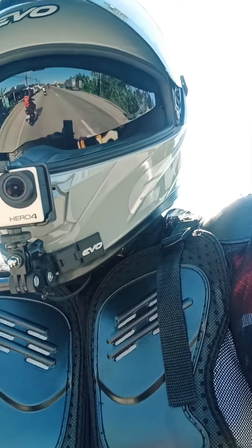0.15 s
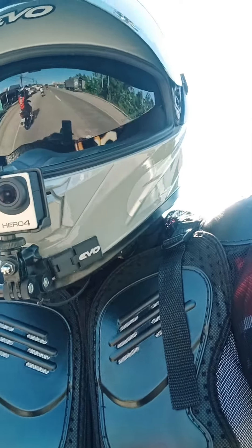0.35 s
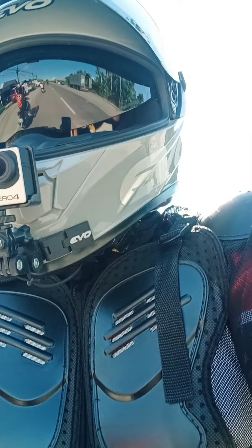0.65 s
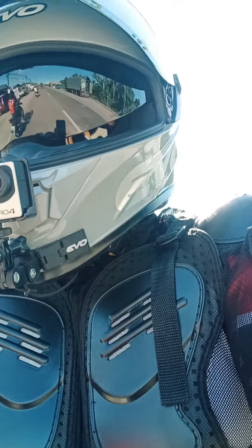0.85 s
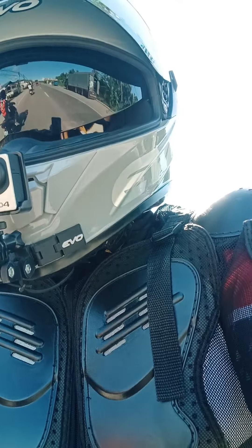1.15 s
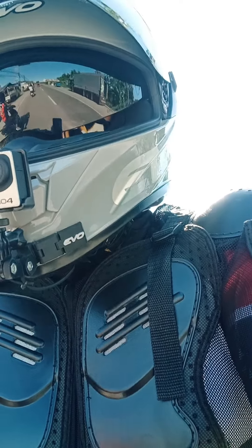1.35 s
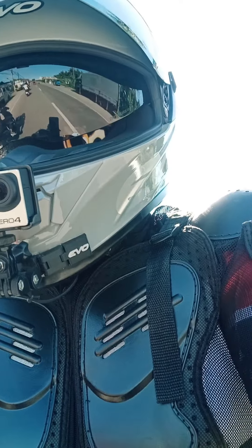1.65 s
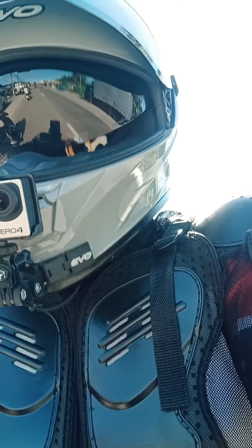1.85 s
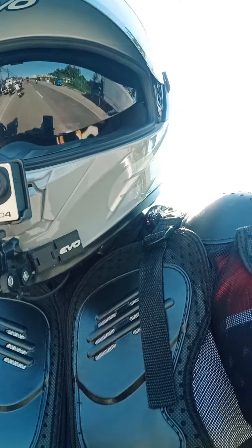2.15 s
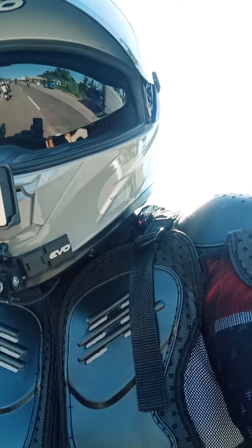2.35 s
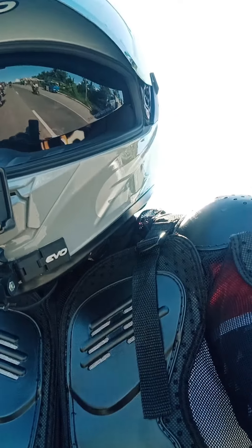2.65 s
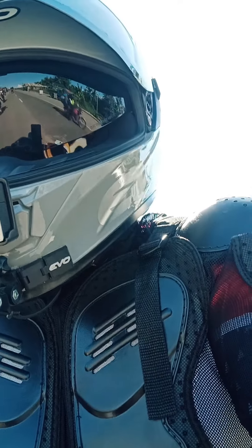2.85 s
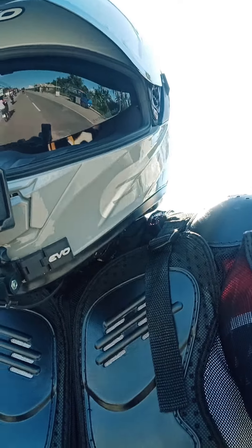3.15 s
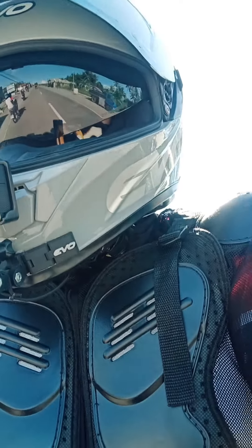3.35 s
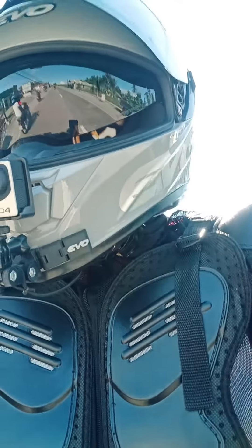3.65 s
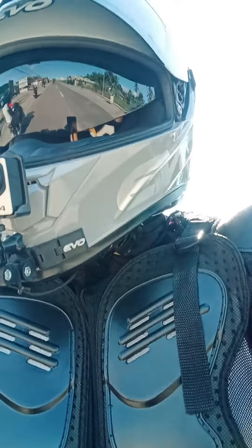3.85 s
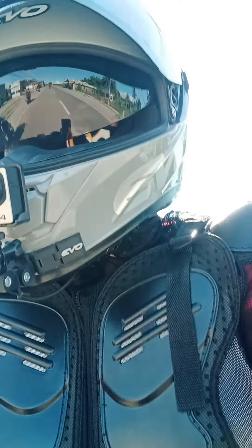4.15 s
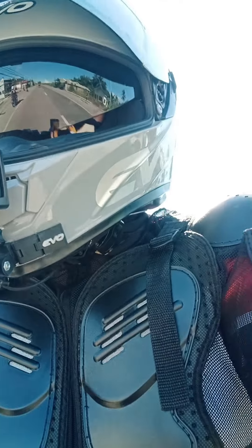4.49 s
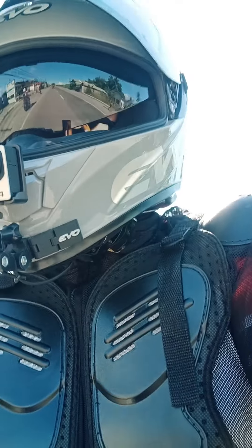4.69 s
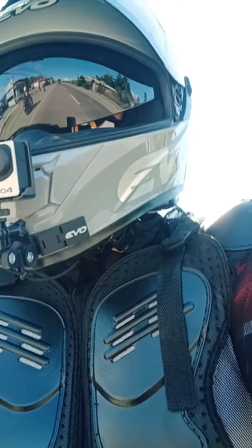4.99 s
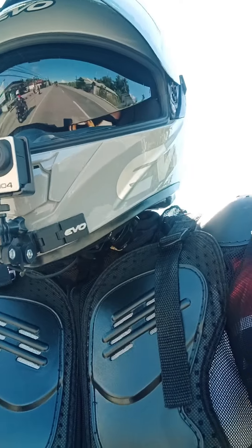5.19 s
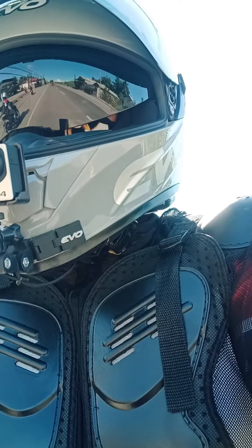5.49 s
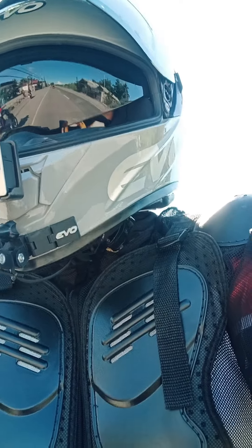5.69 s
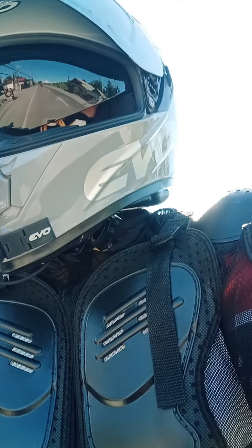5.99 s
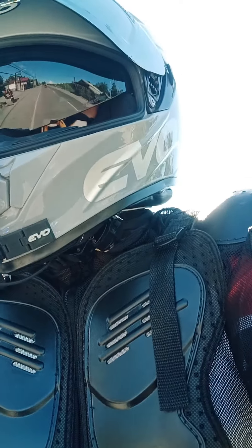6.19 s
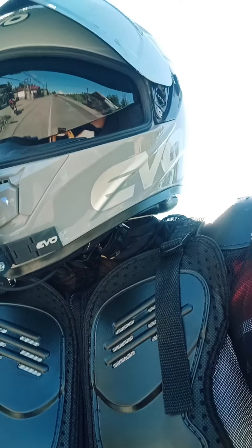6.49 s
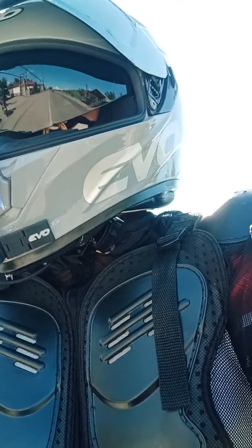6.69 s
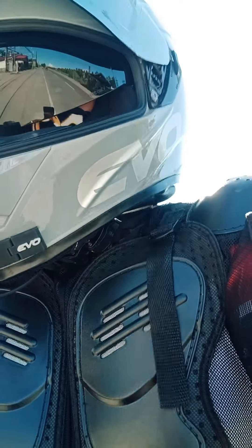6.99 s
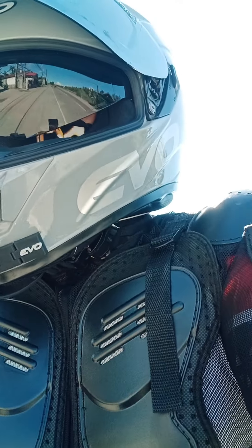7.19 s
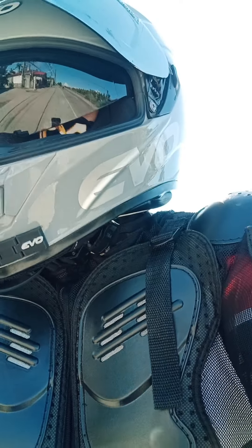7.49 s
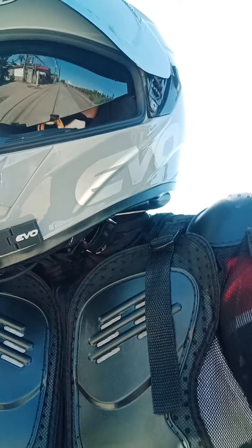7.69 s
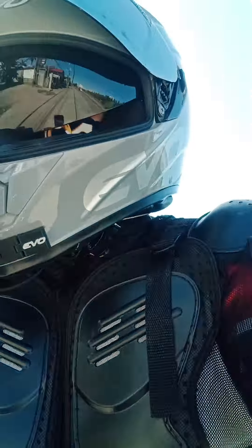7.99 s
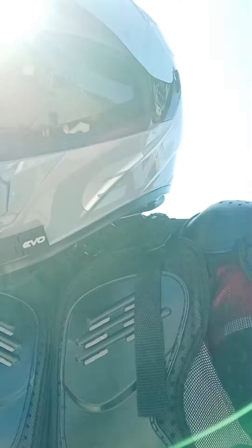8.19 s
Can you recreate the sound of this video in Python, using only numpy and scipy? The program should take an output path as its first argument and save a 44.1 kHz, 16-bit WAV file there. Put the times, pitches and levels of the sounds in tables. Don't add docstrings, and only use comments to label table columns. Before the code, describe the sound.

Close, muffled scooter engine heard from a closed camera housing on the handlebar: a dull low throb with a rough bark, over wind rumble and soft tyre hiss. Broken road knocks the mount early, then a parked truck throws the exhaust back hollow and raspy. More bumps follow, the engine stumbles and surges, a far horn toots faintly, and the ride ends coasting lower.

```python
import sys
import numpy as np
from scipy import signal
from scipy.fft import rfft, irfft, next_fast_len
from scipy.io import wavfile
from scipy.ndimage import uniform_filter1d, map_coordinates

SR = 44100
rng = np.random.default_rng(int(sys.argv[2]) if len(sys.argv) > 2 else 0)


def to_wav(sig):
    pcm = np.clip(np.atleast_2d(sig), -1, 1) * 32767
    pcm = np.round(pcm).astype(np.int16)
    wavfile.write(sys.argv[1], SR, pcm.T)


def field_ratio(decibels):
    return 10 ** (np.asarray(decibels, dtype=float) / 20)


N = 367794

# start in seconds, length in seconds, pitch in Hz, rms level in dB.
HORN_TOOTS = [
    (5.978, .085, 3053, -60),
    (6.143, .065, 3050, -63),
    (6.295, .045, 2780, -66),
    (6.393, .07, 3047, -63),
    (6.4, .09, 1085, -62),
    (6.63, .06, 3048, -62.5),
]
# time in seconds, peak level in dB.
GRIT_HITS = [
    (1.83, -43),
    (3.772, -42),
    (3.7845, -27),
    (3.812, -44),
]
# centre in Hz, width in Hz, level in dB.
SHELL_RINGS = [(4350, 300, 3), (5900, 350, -7), (8300, 900, -12), (11400, 800, -13), (14200, 1200, -10)]

# time in seconds, peak level in dB, rattle level in dB above the knock.
BUMPS = [(.158, -39, -23), (0.552, -33, -17.5), (.573, -34, -31), (.609, -39, -25), (0.654, -36, -36),
         (.708, -36, -19.5), (.802, -43, -27), (1.041, -38, -23.5), (1.192, -38, -24), (1.226, -36, -22),
         (1.248, -32, -31), (1.569, -43, -21), (3.411, -43, -1), (3.988, -44.5, -19.5),
         (4.288, -30.5, -27.5), (4.379, -37, -17), (4.476, -38, -19), (4.561, -37, -24.5),
         (4.572, -31, -16.5), (4.603, -32, -18.5), (4.632, -31.5, -23), (4.661, -36.5, -26.5),
         (4.77, -32, -20), (4.795, -33, -16.5), (4.905, -38, -12.5), (5.705, -40, -20), (5.997, -29, -9),
         (6.028, -30.5, -19), (6.168, -31, -20.5), (6.199, -26.5, -22.5)]
# start in seconds, end in seconds, peak level in dB.
ROUGH_ROAD = [
    (0, 0.802, -38),
    (0.999, 1.75, -47),
    (3.842, 4.562, -45.5),
]
# centre in Hz, width in Hz, level in dB.
FRAME_RINGS = [(304, 230, -17), (380, 114, 14), (634, 343, 4.5)]
# centre in Hz, width in Hz, level in dB.
PANEL_RINGS = [(745, 300, -3), (1383, 260, -2), (1640, 280, -6.5), (2820, 1400, -25.5)]
# centre in Hz, width in Hz, level in dB.
LOOSE_RINGS = [(3000, 790, -7), (4360, 1400, -5), (6230, 1500, -5), (8150, 1500, -7.5), (14500, 2300, -14)]
STRAP_LOOSE_UNTIL_S = 2

# time in seconds, buffeting level in dB.
WIND_LEVEL = [(0, -32), (.6, -32.5), (.9, -38), (2.0, -42.5), (2.8, -37.5), (3.3, -39), (4.0, -37),
              (4.6, -35), (5.2, -38.5), (6.1, -41), (6.6, -40.5), (8.34, -48.5)]
# frequency in Hz, level in dB per Hz.
BUFFET_COLOUR = [(15, -44), (25, -33), (40, -24), (60, -10), (90, 0), (140, -1), (200, -6), (260, -30),
                 (400, -80)]
# frequency in Hz, level in dB per Hz.
WHISTLE_COLOUR = [(5880, -29.5), (10000, -3.5), (12600, -1), (14900, 5), (15500, 6.5)]
# frequency in Hz, level in dB per Hz.
HISS_COLOUR = [(1150, -10), (1950, -2.5), (2250, -7), (2760, -1), (3080, -5), (3210, -4.5), (4320, -6.5),
               (6480, -12.5), (8060, -9), (9730, -21.5), (11000, -30.5), (14300, -42.5), (22000, -120)]
# time in seconds, level in dB over the open road.
ROADSIDE_ECHO = [(0, 1.5), (.4, -2), (1.0, -2), (2.08, -1), (2.3, 3), (2.7, 8), (2.95, 2.5), (3.2, 1.5),
                 (4.15, 1), (4.4, 2), (4.8, 0), (6.2, -0.5), (6.55, 3), (7.0, 2.5), (7.3, 1), (7.8, -0.5),
                 (8.34, 0.5)]
WHISTLE_DB, WHISTLE_ECHO, WHISTLE_MIDDLE_DB = -72.0, 1.1, 3
HISS_DB, HISS_ECHO = -60.1, 0.96
RASP_DB, RASP_ECHO = -63.45, 1.4
BARK_DB, BARK_ECHO, BARK_WIND, BARK_PULL, BARK_COAST_DB = -38.5, 0.62, 0.64, 0.3, -2.5

# start in seconds, end in seconds, multiple of the firing rate, rms level in dB.
DRIVE_WHINE = [
    (5.08, 5.9, 76, -76),
    (5.08, 5.9, 94.7, -77),
    (6.65, 7.75, 65.8, -78),
    (6.65, 7.75, 71.8, -76),
    (6.65, 7.4, 96, -80),
]

# time in seconds, echo level in dB.
TRUCK_ECHO = [(1.95, -89), (2.1, -43), (2.45, -43), (2.65, -39.5), (2.85, -38), (3.05, -43.5),
              (3.25, -50.5), (3.45, -85)]
# centre in Hz, width in Hz, level in dB.
TRUCK_BOX = [(399, 60, 0.91), (530, 130, -0.94), (648, 152, -1.5)]
# start in seconds, end in seconds, change in dB.
TRUCK_NULLS = [
    (2.087, 2.355, -20),
    (2.988, 3.18, -17),
]
TRUCK_CANCEL_DB = [-5.5, -2.5, 1.5]

# frequency in Hz, level in dB per Hz.
BARK_COLOUR = [(130, -39), (215, 3.5), (318, -8), (386, -9.5), (453, -12.5), (553, -15.5), (1000, -32.5),
               (1300, -51), (2200, -120)]
# frequency in Hz, level in dB per Hz.
RASP_COLOUR = [(530, -24), (900, -0.5), (1030, -3), (1310, -1.5), (1610, 0), (2300, -21.5), (2990, -45),
               (5060, -120)]
# frequency in Hz, rms level in dB.
WEAK_ORDERS = [(55, -54), (70, -44), (90, -36), (200, -40), (260, -43), (300, -47), (350, -52), (450, -58),
               (550, -55), (700, -63), (900, -67), (1150, -77), (1400, -72)]
# frequency in Hz, level in dB.
PIPE_ANSWER = [(90, -7.5), (105, -3.5), (125, -5), (139, -4), (154, 0), (175, -1.5), (190, -10.5),
               (225, -19)]
# time in seconds, beat level in dB.
ENGINE_PULL = [(0, -27), (.5, -28.5), (1.1, -29), (1.5, -30.5), (2.1, -31), (2.4, -29), (2.65, -26.5),
               (3.1, -26), (3.3, -28), (3.5, -25.5), (4.3, -25.5), (4.8, -28), (5.15, -23.5), (5.7, -25),
               (6.05, -27.5), (6.5, -22.5), (7.6, -24), (8.34, -27.5)]
# time in seconds, firings per second.
FIRING_RATE = [(0.0, 40.06), (1.005, 36.72), (1.958, 33.78), (2.175, 36.15), (2.554, 34.82), (3.004, 36.03),
               (3.34, 33.59), (3.483, 35.49), (4.508, 32.71), (4.755, 36.52), (4.967, 36.82),
               (5.135, 41.01), (5.978, 33.94), (6.221, 37.24), (6.392, 35.54), (6.617, 45.27),
               (6.902, 42.72), (8.34, 30.45)]
# start in seconds, end in seconds, scatter of the firing moment in cycles.
STUMBLES = [
    (2.05, 2.45, .025),
    (3.24, 3.48, .06),
    (4.53, 4.95, .075),
    (5.95, 6.29, .075),
]
FIRST_TURN, FLYWHEEL_S = .828, .06
STRONG_ORDERS = range(3, 6)

TOP_HZ = 15600


def curves(rows):
    s, *columns = np.transpose(rows)
    return [np.interp(np.arange(N) / SR, s, column) for column in columns]


def unit(x):
    return x / np.sqrt(np.mean(x ** 2) + 1e-20)


def wobble(rate):
    at = np.arange(0, N + 64, 64)
    points = rng.standard_normal(int(N * rate / SR) + 4)
    return np.interp(np.arange(N), at, map_coordinates(points, [at * rate / SR]))


def gate(start, end, edge):
    t = np.arange(N) / SR
    return np.clip(np.minimum(t - start, end - t) / edge + .5, 0, 1)


def filtered(x, response):
    m = next_fast_len(N + 8192)
    return irfft(rfft(x, m) * response(np.fft.rfftfreq(m, 1 / SR)), m)[:N]


def coloured(x, spectrum):
    f, db = np.transpose(spectrum)

    def response(hz):
        return field_ratio(np.interp(np.log(hz + 1), np.log(f), db, -120, -120))
    return unit(filtered(x, response))


def ringing(x, modes):
    def response(f):
        total = 0
        for k, (centre, width, db) in enumerate(modes):
            swing = 1j * f * width
            total = total + (-1) ** k * field_ratio(db) * swing / (centre * centre - f * f + swing)
        return total
    return filtered(x, response)


def bursts(times, levels_db, t60):
    t = np.arange(int(.06 * SR)) / SR
    attack = 1 - np.exp(-t / 0.001)
    x = np.zeros(N + len(t))
    for s, db, life in np.broadcast(times, levels_db, t60):
        x[round(s * SR):][:len(t)] += field_ratio(db - 60 * t / life) * attack * rng.standard_normal(len(t))
    return x[:N]


def crank():
    rate = uniform_filter1d(curves(FIRING_RATE)[0], int(FLYWHEEL_S * SR))
    return rate, FIRST_TURN + np.cumsum(rate) / SR


def shaft():
    scatter = .003 + sum(size * gate(a, b, .08) for a, b, size in STUMBLES)
    return 2 * np.pi * (crank()[1] + scatter * .8 * wobble(30))


def puffs(lead, decay, steady, scatter_db):
    turn = crank()[1] + lead
    strengths = field_ratio(scatter_db * rng.standard_normal(int(turn[-1]) + 2))
    size = strengths[turn.astype(int)]
    u = turn % 1 / decay
    return (steady + size * np.e * u * np.exp(-u)) * rng.standard_normal(N)


def orders_db():
    f, db = np.transpose(PIPE_ANSWER)
    rate = crank()[0]
    near = np.clip((curves(TRUCK_ECHO)[0] + 60) / 15, 0, 1)
    pull_db, = curves(ENGINE_PULL)
    levels = []
    for k, cut in zip(STRONG_ORDERS, TRUCK_CANCEL_DB):
        levels.append(pull_db + np.interp(np.log(k * rate), np.log(f), db) + near * cut)
    levels[0] = levels[0] + sum(null_db * gate(a, b, 0.071) for a, b, null_db in TRUCK_NULLS)
    return levels


def horn():
    t = np.arange(N) / SR
    drift = .5 * wobble(40)
    x = np.zeros(N)
    for s, length, hz, db in HORN_TOOTS:
        on = np.clip(np.minimum(t - s, s + length - t) / .014, 0, 1)
        x += np.sqrt(2) * field_ratio(db) * on * np.sin(2 * np.pi * hz * t + drift)
    return x


def air():
    echo_db, = curves(ROADSIDE_ECHO)
    gust = wobble(11)
    hiss_db = HISS_DB + HISS_ECHO * echo_db + 0.68 * gust
    hiss = coloured(puffs(0.43, decay=.15, steady=4.5, scatter_db=5), HISS_COLOUR)
    whistle_db = WHISTLE_DB + WHISTLE_ECHO * echo_db + WHISTLE_MIDDLE_DB * gate(2.5, 6.2, 0.58)
    whistle_db = whistle_db + .3 * gust + 1.9 * wobble(40)
    whistle = coloured(rng.standard_normal(N), WHISTLE_COLOUR)
    buffet_db = curves(WIND_LEVEL)[0] + 1.5 * wobble(8)
    buffet = coloured(rng.standard_normal(N), BUFFET_COLOUR)
    return field_ratio(hiss_db) * hiss + field_ratio(whistle_db) * whistle + field_ratio(buffet_db) * buffet


def grit():
    x = np.zeros(N)
    for s, db in GRIT_HITS:
        x[round(s * SR)] = field_ratio(db + 22.5)
    return ringing(x, SHELL_RINGS)


def knocks():
    small = []
    for start, end, db in ROUGH_ROAD:
        for u, v in rng.random((8, 2)):
            small.append((start + (end - start) * u, db + 6 * (v - .5), -21))
    s, db, rattle_db = np.transpose(BUMPS + small)
    early = s < STRAP_LOOSE_UNTIL_S
    thud = ringing(bursts(s, -23.5 + 0.4 * (db + 36), t60=0.055), FRAME_RINGS)
    panel = ringing(bursts(s, db + 6.5, t60=np.where(early, 0.075, 0.098)), PANEL_RINGS)
    clatter = ringing(bursts(s, db + np.where(early, 0, -15), t60=0.035), LOOSE_RINGS[:1])
    rattle = ringing(bursts(s, db + rattle_db + 0.5, t60=0.17), LOOSE_RINGS[1:])
    return thud + panel + clatter + rattle


def whine():
    turn = crank()[1]
    x = np.zeros(N)
    for a, b, k, db in DRIVE_WHINE:
        tone = np.sin(2 * np.pi * k * turn + 1.3 * wobble(60))
        x += field_ratio(db + 5 + 2.5 * wobble(5)) * gate(a, b, .2) * tone
    return x


def truck(tones):
    hollow = unit(ringing(ringing(tones, TRUCK_BOX), TRUCK_BOX))
    rush = unit(ringing(puffs(.3, decay=.12, steady=.6, scatter_db=2.5), TRUCK_BOX))
    rasp = unit(ringing(puffs(.27, decay=.075, steady=.26, scatter_db=1), PANEL_RINGS[:3]))
    level_db, = curves(TRUCK_ECHO)
    return field_ratio(level_db) * (hollow + .6 * rush) + field_ratio(1.7 * (level_db + 36.5) - 48) * rasp


def bark():
    echo_db, = curves(ROADSIDE_ECHO)
    bark_db = BARK_DB + BARK_ECHO * echo_db + BARK_WIND * (curves(WIND_LEVEL)[0] + 40)
    bark_db = bark_db + BARK_PULL * (curves(ENGINE_PULL)[0] + 26) + BARK_COAST_DB * gate(6.95, 9, .4)
    rasp_db = RASP_DB + RASP_ECHO * echo_db
    low = coloured(puffs(.35, decay=.16, steady=1.0, scatter_db=2.5), BARK_COLOUR)
    high = coloured(puffs(.28, decay=.13, steady=1.2, scatter_db=2), RASP_COLOUR)
    return field_ratio(bark_db + 1.2 * wobble(12)) * low + field_ratio(rasp_db + 0.9 * wobble(13)) * high


def overtones(angle):
    step = 8
    rate, angle = crank()[0][::step], angle[::step]
    log_rate = np.log(rate)
    f, db = np.transpose(WEAK_ORDERS)
    x = np.zeros(len(rate))
    for k in [2, *range(6, 40)]:
        lead = .5 + .022 * np.maximum(k * rate - 190, 0)
        waver = .003 * k * k * wobble(4)[::step] + .05 * k * rng.normal()
        level_db = np.interp(log_rate, np.log(f / k), db) + 2.5 * wobble(7)[::step]
        x += field_ratio(level_db) * np.cos(k * angle + lead + waver)
    growth_db = .8 * (np.max(orders_db(), axis=0) + 26)
    return field_ratio(growth_db) * signal.resample_poly(x, step, 1)[:N]


def exhaust(angle):
    beat = np.zeros(N)
    for k, db in zip(STRONG_ORDERS, orders_db()):
        beat += field_ratio(db + .6 * wobble(14) + .6 * wobble(5)) * np.cos(k * angle + .5)
    return np.sqrt(2) * field_ratio(.7 * wobble(35)) * beat


def scene():
    angle = shaft()
    tones = overtones(angle)
    engine = exhaust(angle) + tones + truck(tones) + bark() + whine()
    opening = np.minimum(np.arange(N) / (.003 * SR), 1)
    return (opening * (engine + air() + knocks() + grit() + horn()))[None]


def top_cut(x):
    return signal.sosfilt(signal.butter(12, 16750, fs=SR, output="sos"), x)


def record(dry):
    limited = filtered(dry[0], lambda hz: hz < TOP_HZ)
    return top_cut(limited[None])


dry = scene()
out = record(dry)
to_wav(out)
```